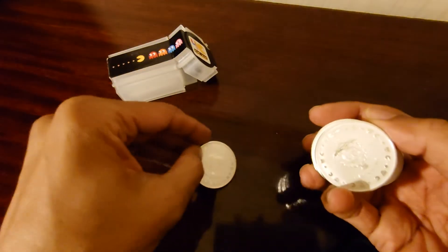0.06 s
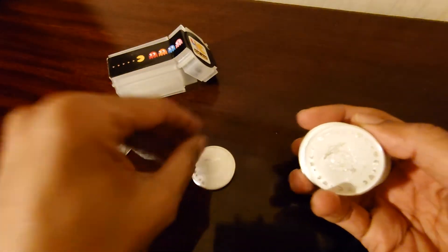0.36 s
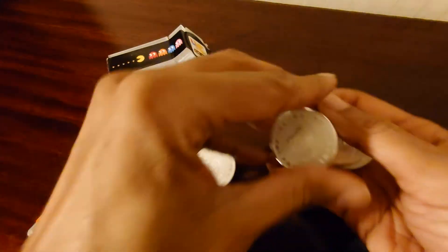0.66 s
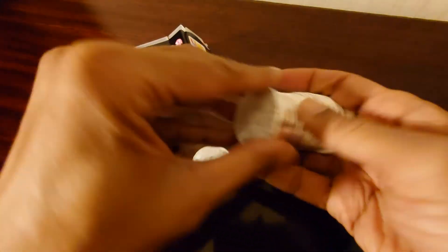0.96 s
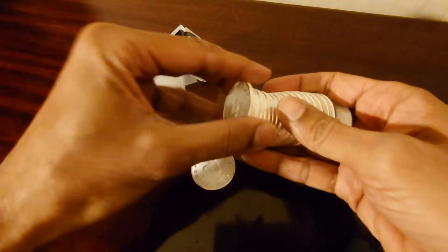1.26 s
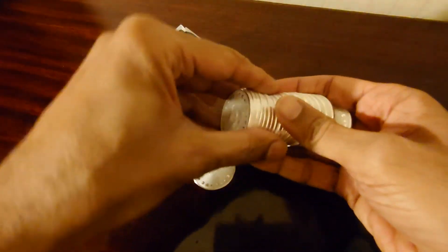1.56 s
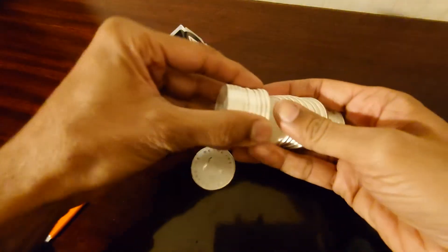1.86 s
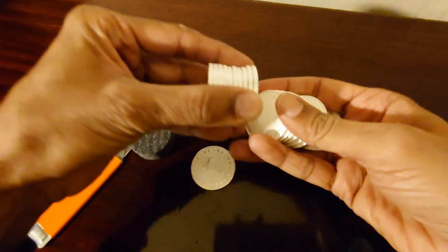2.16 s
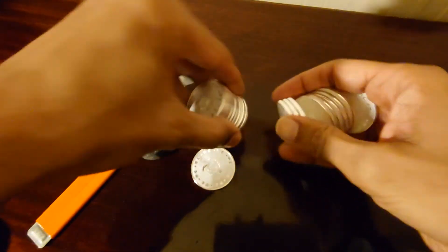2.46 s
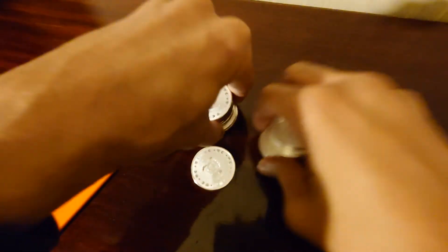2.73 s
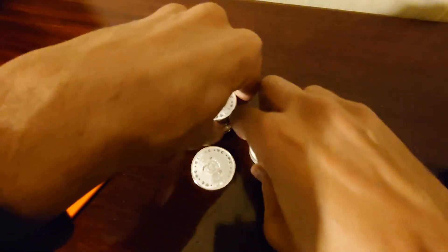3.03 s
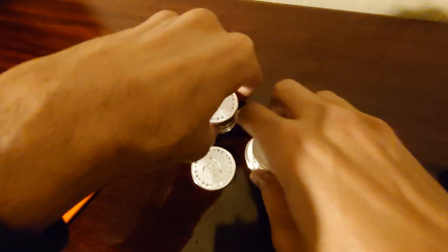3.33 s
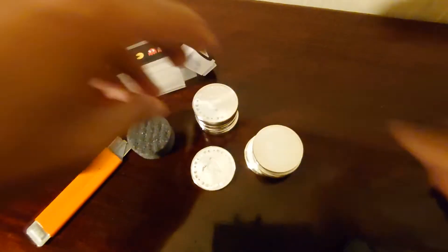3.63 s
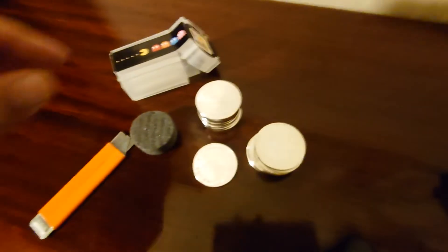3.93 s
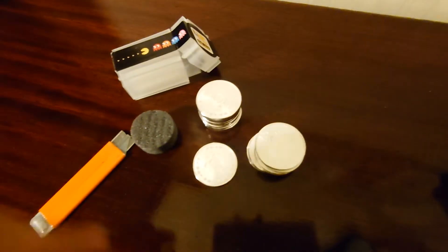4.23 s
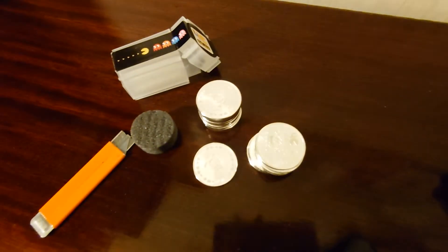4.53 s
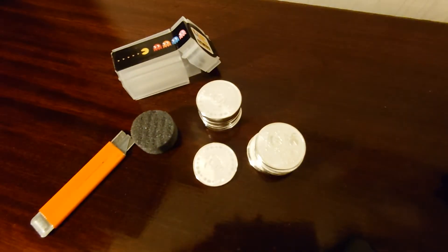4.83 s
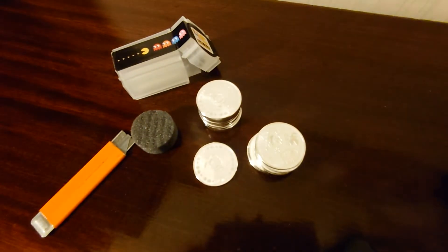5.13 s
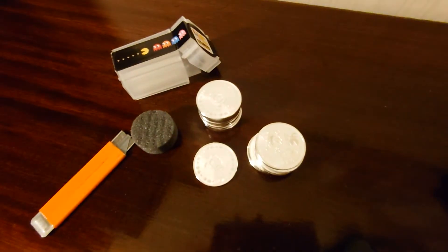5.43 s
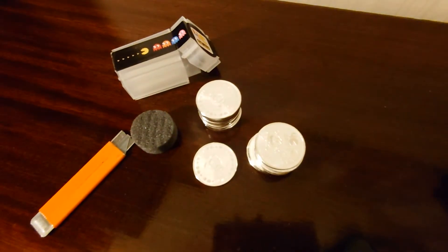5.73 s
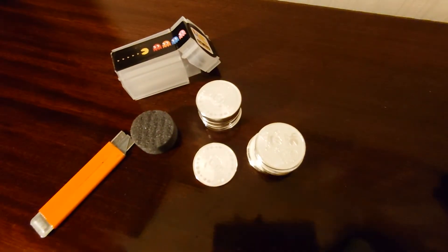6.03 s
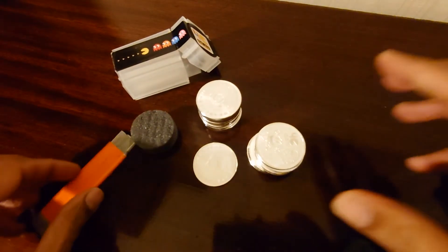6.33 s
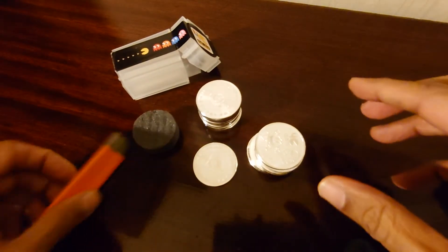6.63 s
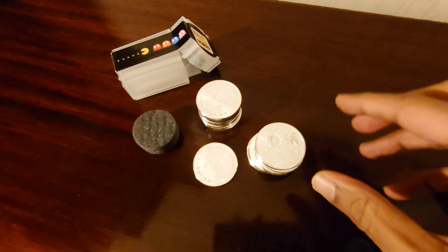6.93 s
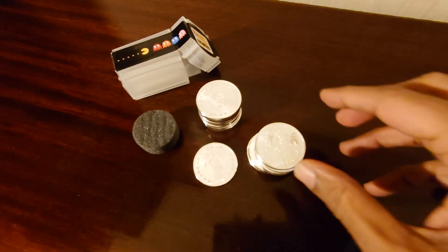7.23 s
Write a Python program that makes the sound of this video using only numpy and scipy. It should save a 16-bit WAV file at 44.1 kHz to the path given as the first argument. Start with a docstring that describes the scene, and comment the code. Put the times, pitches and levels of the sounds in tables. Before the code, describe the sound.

In a quiet room with a steady low hum, a quickening run of coins clinks and rings close to the microphone. The coins then clap and rattle as stacks land on a wooden table, and something bumps the table with a deep thud. Hands and sleeves rustle softly, a weaker thump comes, and a small box cutter faintly slides and taps on the wood as it is picked up.

```python
"""A quiet room with a wooden table. Silver coins tip from one hand into a row in the other, faster and
faster, each scraping, clacking and ringing. They are set down in two stacks that clap, rattle and sound
the table top. Something bumps the table close to the microphone, hands and sleeves rustle, and a small
box cutter slides off the wood as it is picked up. Mains hum and a low rumble lie underneath."""
import sys
import numpy as np
from scipy import signal
from scipy.fft import rfft, irfft
from scipy.io import wavfile
from scipy.ndimage import uniform_filter1d

SR = 44100
rng = np.random.default_rng(int(sys.argv[2]) if len(sys.argv) > 2 else 0)


def generate_wav(sig):
    """Save sig (samples, or channels by samples) to the path in sys.argv[1] as 16-bit PCM at SR."""
    pcm = np.round(np.clip(np.atleast_2d(sig).T, -1, 1) * 32767).astype(np.int16)
    wavfile.write(sys.argv[1], SR, pcm)


N = 329868
CLOCK = np.arange(N) / SR
HIT_SAMPLES = 16384
T = np.arange(HIT_SAMPLES) / SR

# coins tipping onto the row: (time [s], strength [dB], relative ring level [dB])
COIN_TIPS = [(0.594, -24, -64.5), (.662, -27, -67), (0.729, -24.5, -59.5), (.788, -22.5, -59.5),
             (0.846, -22.5, -52), (.903, -27, -67), (.956, -26, -66), (1.009, -25, -61.5),
             (1.056, -24, -64.5), (1.103, -23, -55.5), (1.148, -23, -61.5), (1.186, -24.5, -61.5),
             (1.231, -27.5, -68), (1.264, -27.5, -66.5), (1.296, -26, -62.5), (1.327, -28, -61),
             (1.361, -25.5, -60.5), (1.385, -33, -67), (1.407, -32.5, -55.5), (1.426, -30.5, -59.5),
             (1.446, -35, -70)]
# stacks landing or rocking: (time [s], strength [dB], wood level [dB], relative edge level [dB])
LANDINGS = [(3.207, -43.5, -50, -63.5), (3.29, -48.5, -64, -43), (3.3, -38, -48.5, -41.5),
            (3.33, -32, -44.5, -39.5), (3.3441, -30, -41.5, -48.5), (3.362, -30, -46.5, -49.5),
            (3.42, -36, -41, -46), (3.524, -49, -52, -56.5), (3.5379, -28.5, -30, -48.5),
            (3.5543, -17, -29.5, -30), (3.565, -29.5, -33, -50), (3.644, -57, -57, -63.5),
            (3.728, -39.5, -37.5, -57)]
# modes of a silver coin: (frequency [Hz], relative level [dB], t60 [s])
COIN_MODES = [(4536, 7, 0.18), (5082, -6.5, 0.11), (7865, 2, 0.41), (10000, 2, 0.15)]
# modes of the table top: (frequency [Hz], relative level [dB], t60 [s])
WOOD_MODES = [(75, -14.5, 0.7), (161, -7.5, .06), (250, -2, .05), (275, -0.5, 0.023), (297.5, -19, .6),
              (328, 0, 0.14), (439, -6, 0.08), (514, -1, 0.051)]
# spectrum of stacked coins clapping together: (frequency [Hz], relative level [dB])
STACK_SPECTRUM = [(300, -26), (600, -18.5), (1000, -0.5), (1300, 3), (1850, 2.5), (2400, -5.5),
                  (3000, -6.5), (3600, -10), (4900, -10), (5800, -30), (9000, -36), (16000, -49)]
# spectrum of the bright edge of a hit: (frequency [Hz], relative level [dB])
EDGE_SPECTRUM = [(1500, -28), (3000, -5), (4600, 6.5), (6000, 0.5), (8500, -6), (11000, 2), (13500, -7),
                 (16000, -15.5)]
# spectrum of a thin metallic graze: (frequency [Hz], relative level [dB])
CHINK_SPECTRUM = [(400, -17.5), (1200, -5.5), (2200, 0.5), (3300, 0), (4600, 5), (5400, -10.5),
                  (7000, -21.5), (16000, -34.5)]


def amp(db):
    """Decibels to gain."""
    return 10 ** (np.asarray(db) / 20)


def unit(x):
    """Scales to rms 1."""
    return x / np.sqrt(np.mean(x ** 2) + 1e-30)


def at_level(x, db):
    """Gives a stereo hit the energy of 20 ms of sound at this level."""
    return amp(db) * x * np.sqrt(.02 * SR * 2 / np.sum(x ** 2))


def read(points, hz):
    """Reads a table along a log-frequency axis."""
    f, value = np.transpose(points)
    return np.interp(np.log(hz + 1), np.log(f + 1), value)


def add(mix, s, sound):
    """Mixes a stereo sound in at time s."""
    part = mix[:, max(round(s * SR), 0):][:, :sound.shape[1]]
    part += sound[:, :part.shape[1]]


def pan(db):
    """Gains for a source this much louder on the left."""
    return amp([[db / 2], [-db / 2]])


def through(x, response):
    """Convolves each channel and keeps the length."""
    return signal.fftconvolve(x, np.atleast_2d(response), axes=1)[:, :x.shape[1]]


def bandpass(x, low_hz, high_hz, order=2):
    """Butterworth band-pass."""
    return signal.sosfilt(signal.butter(order, [low_hz, high_hz], "band", fs=SR, output="sos"), x)


def colour(points, stretch=1, size=2048):
    """Minimum-phase impulse response with the given spectrum."""
    hz = abs(np.fft.fftfreq(size, 1 / SR))
    log_gain = np.log(amp(read(points, hz / stretch)))
    return np.fft.ifft(np.exp(np.conj(signal.hilbert(log_gain)))).real[:size // 2]


def ring(modes, detune=1):
    """Impulse response of a set of dying modes."""
    return sum(amp(db - 60 * T / t60) * np.sin(2 * np.pi * hz * detune * T) for hz, db, t60 in modes)


def stereo_noise(size, split_hz):
    """Noise that is centred below split_hz and wide above."""
    left, other = rfft(rng.standard_normal((2, size)))
    coherence = .97 / np.sqrt(1 + (np.fft.rfftfreq(size, 1 / SR) / split_hz) ** 8)
    right = coherence * left + np.sqrt(1 - coherence ** 2) * other
    return irfft(np.array([left, right]), size)


def contact(chatter_s, chatter_db, fall_s, tail_db, tail_s, count=8, lead_s=.038):
    """One impact at lead_s amid a chatter of lesser ones, each scattered briefly by hands and table."""
    offset, size = rng.standard_normal((2, count))
    chatter_times = lead_s + np.clip(offset * chatter_s, -lead_s, lead_s)
    impacts = np.zeros(HIT_SAMPLES)
    impacts[np.round(chatter_times * SR).astype(int)] = amp(chatter_db) * unit(size)
    impacts[round(lead_s * SR)] = 1
    decay = np.exp(-T / fall_s) + amp(tail_db) * np.exp(-T / tail_s)
    scatter = stereo_noise(HIT_SAMPLES, split_hz=1100) * decay
    return lead_s, through(scatter, impacts)


def strokes(rows, end_db=-3.5):
    """Envelope of rubbing strokes that each swell and fade in one arch."""
    arches = (amp(db + end_db * (2 * (CLOCK - s) / length) ** 2) for s, length, db in rows)
    return np.sqrt(sum(arch ** 2 for arch in arches))


def friction(envelope, spectrum, grain_db, grain_s):
    """Rubbing: noise that catches and slips in small grains."""
    roughness = unit(uniform_filter1d(rng.standard_normal(N), max(int(grain_s * SR), 1)))
    grains = stereo_noise(N, split_hz=1500) * amp(grain_db * roughness)
    return envelope * unit(through(grains, colour(spectrum)))


def coin_cascade():
    """Each coin claps onto the packed row and rings; the fingers damp the last ones."""
    # spectrum of a coin meeting the row: (frequency [Hz], relative level [dB])
    clack_spectrum = [(200, -33.5), (330, -5), (600, -26.5), (950, -7.5), (1300, -4.5), (1900, 9),
                      (2400, 0), (3200, -11), (4500, -15), (6000, -30.5), (8500, -58.5), (11000, -52.5),
                      (13000, -70), (16000, -72.5)]
    # modes of coins pressed face to face: (frequency [Hz], relative level [dB], t60 [s])
    row_modes = [(1800, -0.5, 0.2), (1916, 3.5, 0.21), (2106, -6, 0.033), (2273, 0.5, 0.21),
                 (2582, -10, .1), (2757, -7, 0.049), (2980, -5, .11)]
    out = np.zeros((2, N))
    for s, strength_db, ring_db in COIN_TIPS:
        lead, drive = contact(.0024, chatter_db=-12, fall_s=.002, tail_db=-17.5, tail_s=.016, count=40)
        sustain = np.interp(s, [1.2, 1.4], [1, .3])
        detune = rng.uniform(.999, 1.006)
        knock = at_level(hollow_ring(drive, detune, sustain=.72), strength_db)
        clack = at_level(through(drive, colour(clack_spectrum)), strength_db - 4)
        row_ring = bandpass(through(drive, ring(row_modes, detune)), 1400, 3400, order=4)
        row = at_level(row_ring, strength_db - 16)
        silver = sum(at_level(silver_ring(drive, hz, t60 * sustain), ring_db + db - 1.5)
                     for hz, db, t60 in COIN_MODES)
        wood = at_level(through(drive, ring(WOOD_MODES)), strength_db - 20)
        add(out, s - lead, (knock + clack + row + wood) * pan(2.7) + silver * pan(3))
    return out


def silver_ring(drive, hz, t60, width_hz=700):
    """One clean mode of a coin, heard only around its own pitch."""
    return bandpass(through(drive, ring([(hz, 0, t60)])), hz - width_hz / 2, hz + width_hz / 2)


def hollow_ring(drive, detune=1, sustain=1):
    """A hollow midrange body; a firm grip (low sustain) shortens it."""
    # hollow resonances that the coins excite: (frequency [Hz], relative level [dB], undamped t60 [s])
    modes = [(678, -12, 0.29), (905, -7, 0.25), (942, -1.5, 0.11), (923.3, 6.5, 0.16), (1010, 4, 0.12),
             (1036, -6, 0.081), (1112, 3.5, .06), (1455, -2.5, 0.2), (1556, -16, 0.05)]
    gripped = [(hz, db, t60 * sustain) for hz, db, t60 in modes]
    return bandpass(through(drive, ring(gripped, detune)), 830, 2100, order=4)


def rim_scrape():
    """Milled rims scrape and sing faintly, louder as the coins tip faster; then held coins slide."""
    # spectrum of milled rims scraping: (frequency [Hz], relative level [dB])
    rasp_spectrum = [(180, -17.5), (330, -6), (620, -12.5), (950, 3.5), (1300, 1), (1900, -5.5),
                     (3000, -15), (4500, -16), (5800, -33), (8800, -45.5), (10300, -34.5), (12500, -56.5),
                     (16000, -76.5)]
    # held coins sliding over each other: (centre time [s], length [s], level [dB])
    slides = [(1.695, 0.027, -48.5), (1.935, 0.055, -69.5), (2.93, 0.062, -64)]
    db_per_doubling, fade_db_per_s, linger_s = 10, 549, .013
    times = np.array(COIN_TIPS)[:, 0]
    coins_per_s = np.interp(CLOCK, times[1:], 1 / np.diff(times))
    outside_s = abs(CLOCK - np.clip(CLOCK, times[0] + linger_s, times[-1] + linger_s))
    scrape_db = -45.5 + db_per_doubling * np.log2(coins_per_s / 16) - fade_db_per_s * outside_s
    scrape = friction(amp(scrape_db), rasp_spectrum, grain_db=3, grain_s=.0025)
    top_modes = [(hz, db, .025) for hz, db, _ in COIN_MODES[2:]]
    singing = unit(through(scrape, ring(top_modes))) * np.std(scrape)
    held = friction(strokes(slides), CHINK_SPECTRUM, grain_db=6, grain_s=.0098)
    return scrape + amp(-28) * singing + held


def stack_landings():
    """A stack lands: its coins clap together and the table answers beneath."""
    out = np.zeros((2, N))
    wood_tone = bandpass(ring(WOOD_MODES), 110, 550)
    for s, strength_db, wood_db, edge_db in LANDINGS:
        lead, drive = contact(.0016, chatter_db=-13, fall_s=.0038, tail_db=-16, tail_s=.014, count=14)
        wood = at_level(through(drive, wood_tone), wood_db)
        knock = at_level(hollow_ring(drive, detune=rng.uniform(.98, 1.04), sustain=.45), strength_db - 2)
        clack = at_level(through(drive, colour(STACK_SPECTRUM)), strength_db + .87)
        edge = at_level(through(drive, colour(EDGE_SPECTRUM)), edge_db - 5)
        add(out, s - lead, wood + knock * pan(1.4) + clack * pan(-.36) + edge * pan(14))
    return out


def stack_rattle(t60=.28):
    """After each landing the coins of the stack shiver to rest."""
    power = sum((CLOCK > s) * amp(db - 60 * abs(CLOCK - s) / t60) ** 2 for s, db, _, _ in LANDINGS)
    return friction(amp(-23.5) * np.sqrt(power), STACK_SPECTRUM, grain_db=-2.5, grain_s=.0023)


def coin_grazes():
    """Held coins graze: a thin chink whose ring the fingers stop at once."""
    # rims touching between the fingers: (time [s], strength [dB], edge level [dB])
    grazes = [(1.115, -49, -62), (1.541, -49, -79), (1.627, -56, -90), (1.672, -47, -86),
              (1.684, -46.5, -67), (1.699, -51, -67), (1.952, -64, -91), (2.101, -71.5, -88),
              (2.341, -73, -95), (2.739, -52.5, -71), (2.927, -39.5, -50.5), (3.493, -53.5, -66)]
    out = np.zeros((2, N))
    choked = ring([(hz, db, min(t60, .04)) for hz, db, t60 in COIN_MODES], detune=1.01)
    for s, strength_db, edge_db in grazes:
        lead, drive = contact(.002, chatter_db=-10, fall_s=.004, tail_db=-22, tail_s=.014)
        chink = at_level(through(drive, colour(CHINK_SPECTRUM)), strength_db - 3.5)
        edge = at_level(through(drive, colour(EDGE_SPECTRUM)), edge_db)
        silver = at_level(through(drive, choked), edge_db - 2)
        add(out, s - lead, chink + silver + edge * pan(4))
    return out


def table_bumps():
    """A soft blow pushes the air one way and back, and leaves a low ring behind."""
    # dull blows: (time [s], strength [dB], pitch [Hz])
    blows = [(3.9572, -3.5, 304), (5.475, -25, 130), (5.513, -28, 98.5), (5.546, -32, 124)]
    # what rings near the microphone: (frequency [Hz], relative level [dB], t60 [s])
    boom_modes = [(81, -17.5, 0.51), (180, -18, 0.079), (289, -30.5, 0.72), (370, -52, 0.027),
                  (480, -27, 0.091)]
    out = np.zeros((2, N))
    for s, db, hz in blows:
        lead = 2 / hz
        cycles = (T - lead) * hz
        pulse = np.sin(2 * np.pi * cycles) * np.exp(-(cycles / .45) ** 2)
        push = np.array([pulse, pulse])
        boom = through(push, ring(boom_modes)) / abs(pulse).sum()
        add(out, s - lead, amp(db) * (push + boom) * pan(9.2))
    return out


def table_taps():
    """Light things meet the wood: a dry tock over the ring of the table top."""
    # taps of fingers, plastic and cutter: (time [s], tock level [dB], wood level [dB], edge level [dB])
    taps = [(.187, -40.5, -41, -96), (2.191, -72, -53, -93), (2.25, -67.5, -55, -93),
            (3.955, -37.5, -59, -57.5), (3.965, -45.5, -28, -56.5), (4.001, -42, -37.5, -62),
            (5.487, -46, -41.5, -80), (5.772, -57, -65, -85), (6.594, -46, -50, -84),
            (6.662, -48, -74, -88), (6.768, -50.5, -77, -91)]
    # spectrum of a light tap on wood: (frequency before stretch [Hz], relative level [dB])
    tock_spectrum = [(200, 6), (550, -7), (950, 15.5), (1350, 6), (2000, -2), (3500, -12), (5000, -17.5),
                     (6200, -51), (16000, -68)]
    out = np.zeros((2, N))
    for s, tock_db, wood_db, edge_db in taps:
        lead, drive = contact(.0006, chatter_db=-9.5, fall_s=.0026, tail_db=-23, tail_s=.035)
        wood = at_level(through(drive, ring(WOOD_MODES)), wood_db)
        tock = at_level(through(drive, colour(tock_spectrum, stretch=rng.uniform(.86, .87))), tock_db)
        edge = at_level(through(drive, colour(EDGE_SPECTRUM)), edge_db)
        add(out, s - lead, (wood + tock + edge) * pan(3.6))
    return out


def hand_rustle(rest_db=-82.5, catches_per_s=25):
    """Skin and sleeves rub in uneven strokes with small catches, waking the hollow resonances a little."""
    # hand or sleeve movements: (centre time [s], length [s], relative level [dB])
    moves = [(.33, 0.3, -69.5), (3.76, 0.22, -67.5), (4.12, 0.14, -64), (4.49, 0.27, -69),
             (5.03, 0.36, -73.5), (5.53, 0.18, -59.5), (5.7, .2, -68.5), (6.02, 0.2, -62),
             (6.53, 0.46, -73.5), (6.89, 0.1, -70)]
    # spectrum of skin and sleeves rubbing: (frequency [Hz], relative level [dB])
    rub_spectrum = [(120, -26), (200, -3.5), (232, -5), (387, -11), (601, -7.5), (791, -15), (1020, -13.5),
                    (1250, -16.5), (1940, -18), (4500, -26.5), (5630, -48), (9000, -54.5), (10500, -40.5),
                    (12500, -52), (16000, -64)]
    envelope = np.hypot(strokes(moves), amp(rest_db))
    rub = friction(envelope, rub_spectrum, grain_db=2.5, grain_s=.016)
    catches = (rng.random(N) < catches_per_s / SR) * rng.uniform(.2, 1, N) * envelope
    scuff = stereo_noise(HIT_SAMPLES, split_hz=1100) * np.exp(-T / .003)
    ticks = through(through(np.array([catches, catches]), scuff), colour(rub_spectrum))
    rustle = rub + amp(-9) * np.std(rub) * unit(ticks)
    return amp(3) * rustle + amp(-7.5) * np.std(rustle) * unit(hollow_ring(rustle))


def cutter_slide(centre_s=6.51, length_s=.18, level_db=-70.5):
    """The box cutter is drawn across the wood."""
    return friction(strokes([(centre_s, length_s, level_db)]), CHINK_SPECTRUM, grain_db=1, grain_s=.0035)


def room_tone():
    """Slightly wavering mains hum over a bed of low noise and faint hiss."""
    # mains harmonics: (frequency [Hz], level [dB])
    harmonics = [(60, -66), (120, -47), (240, -68.5), (360, -75)]
    # spectrum of the room's noise floor: (frequency [Hz], relative level [dB])
    air_spectrum = [(12, -56.5), (20, -28), (65, -22), (93, -19.5), (123, -12), (146, -11), (177, -16.5),
                    (241, -17), (285, -23.5), (542, -36.5), (923, -34.5), (1480, -47), (3950, -54.5),
                    (5680, -74), (16000, -76.5)]
    knots = np.arange(0, CLOCK[-1] + 1, .25)
    hum = 0
    for hz, db in harmonics:
        waver = .027 * np.interp(CLOCK, knots, rng.standard_normal(len(knots)))
        hum = hum + amp(db) * np.sqrt(2) * np.sin(2 * np.pi * (hz * CLOCK + rng.random()) + waver)
    air = unit(through(stereo_noise(N, split_hz=230), colour(air_spectrum, size=16384)))
    return hum * pan(.18) + amp(-58.5) * air * pan(1.4)


def rumble():
    """A deep, wide rumble, leaning left."""
    return amp(-58.5) * unit(bandpass(rng.standard_normal((2, N)), 42, 85)) * pan(5)


def room_reverb(x):
    """Sparse reflections of a small room, the treble dying first."""
    # decay of the room: (frequency [Hz], t60 [s])
    decay_times = [(100, .3), (1000, .24), (5000, .26), (15000, .18)]
    echoes = rng.standard_normal((2, HIT_SAMPLES)) * (rng.random((2, HIT_SAMPLES)) < .08) * (T > .006)
    hz, t, spectra = signal.stft(echoes, SR, nperseg=256)
    decay = amp(-60 * t / read(decay_times, hz)[:, None])
    tail = signal.istft(spectra * decay, SR, nperseg=256)[1]
    return through(x, tail / np.linalg.norm(tail[0]))


def opposed_phase(x, centre_hz=1290, width_hz=130):
    """In one narrow band the sound reaches the two microphones in opposite phase."""
    b, a = signal.iirpeak(centre_hz, centre_hz / width_hz, fs=SR)
    return np.array([x[0], x[1] - 2 * signal.lfilter(b, a, x[1])])


def scene():
    """Coins, taps, bumps and hands in the humming room."""
    coins = opposed_phase(coin_cascade() + rim_scrape() + stack_landings() + stack_rattle())
    hits = coins + coin_grazes() + table_taps()
    thuds = table_bumps()
    reverb = amp(-16) * room_reverb(hits) + amp(-19) * room_reverb(thuds)
    return hits + thuds + reverb + hand_rustle() + cutter_slide() + room_tone() + rumble()


def record(dry):
    """A steep low-pass at 16 kHz."""
    return signal.oaconvolve(dry, signal.firwin(511, 16000, window=("kaiser", 9), fs=SR)[None], "same")


dry = scene()
out = record(dry)
generate_wav(out)
```